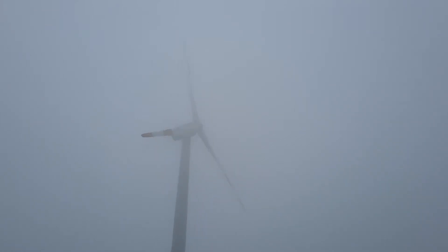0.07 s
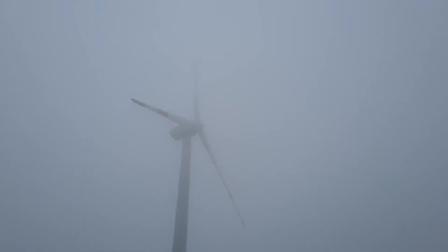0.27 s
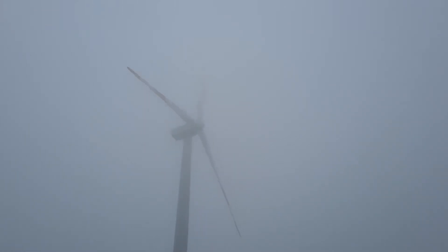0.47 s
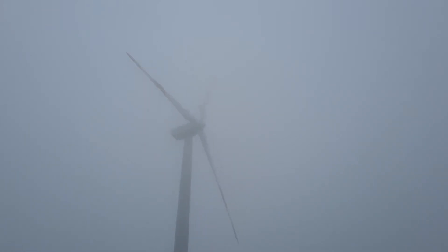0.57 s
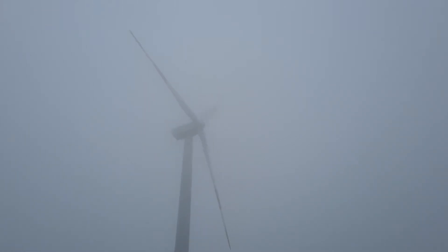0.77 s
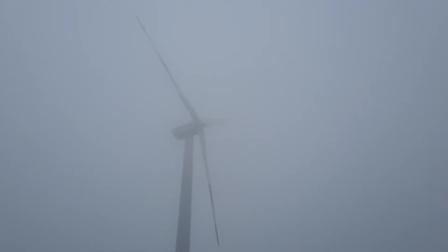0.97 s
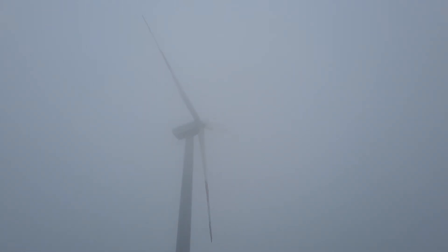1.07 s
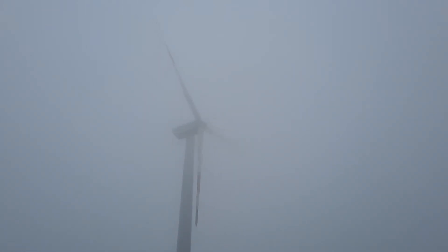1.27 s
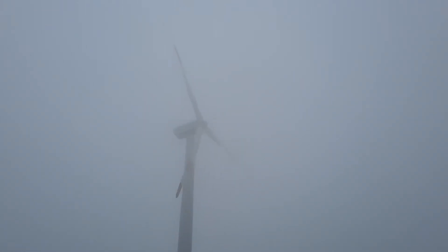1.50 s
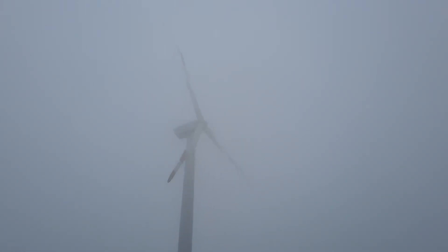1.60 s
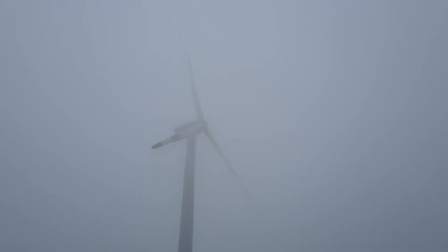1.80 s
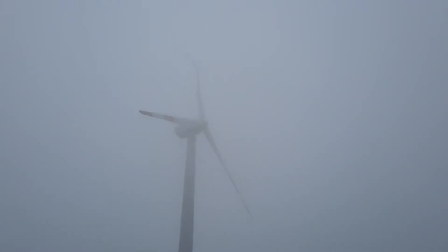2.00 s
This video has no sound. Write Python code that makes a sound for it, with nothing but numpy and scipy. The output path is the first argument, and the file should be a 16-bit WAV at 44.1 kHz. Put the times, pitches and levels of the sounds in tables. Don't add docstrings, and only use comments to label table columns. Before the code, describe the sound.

Rough wind noise right on an unprotected microphone outdoors: deep uneven thuds and fluttering for the first second, then much quieter soft bumps, faint far wind and turbine swish, and thin airy hiss on the left.

```python
import sys
import numpy as np
from scipy import signal
from scipy.io import wavfile
from scipy.ndimage import uniform_filter1d, map_coordinates

SR = 44100
rng = np.random.default_rng(int(sys.argv[2]) if len(sys.argv) > 2 else 0)


def to_wav(sig):
    pcm = np.clip(np.atleast_2d(sig), -1, 1) * 32767
    pcm = np.round(pcm).astype(np.int16)
    wavfile.write(sys.argv[1], SR, pcm.T)


def invert_db(level):
    return 10 ** (np.asarray(level, dtype=float) / 20)


N = 90404
T = np.arange(N) / SR

# middle in seconds, width in seconds, thump level in dB,
# thump pitch in Hz, flutter level in dB.
LEFT_EDDIES = [(0.055, 0.015, -33, 148, -50), (0.083, 0.007, -52, 95, -55),
               (0.119, 0.05, -40.5, 106.5, -43), (0.189, 0.0085, -34, 114, -71.5),
               (0.249, 0.011, -22, 127, -24), (0.285, 0.0098, -22, 111.3, -30.5),
               (0.35, 0.015, -31, 137, -36.5), (0.395, 0.023, -14, 94.7, -24),
               (0.456, 0.038, -28.5, 133, -30.5), (0.505, 0.01, -22.5, 107, -22.5),
               (0.549, 0.051, -24, 96.4, -36.5), (0.597, 0.011, -28.5, 120, -30.5),
               (0.631, 0.0059, -33.5, 124.4, -37), (0.655, 0.013, -20.5, 103.4, -24.5),
               (0.681, 0.015, -21, 142, -38.5), (0.718, 0.013, -25, 107, -25.5),
               (0.756, 0.017, -23, 97.7, -23), (0.785, 0.021, -24.5, 130, -27.5),
               (0.856, 0.033, -30, 119, -35), (0.91, 0.024, -29, 140, -27.5),
               (0.927, 0.016, -53, 140, -19.5), (0.96, 0.016, -37.5, 126, -48),
               (0.987, 0.0062, -21.5, 102.6, -32), (1.017, 0.015, -26, 144, -20.5),
               (1.077, 0.011, -57, 115.6, -42.5), (1.13, 0.0064, -47, 94, -59),
               (1.154, 0.0418, -41.5, 96.7, -59.5), (1.217, 0.028, -44.1, 90, -51.5),
               (1.271, 0.015, -35, 91, -62), (1.34, 0.016, -39.5, 108, -55), (1.493, 0.017, -67, 116, -64),
               (1.558, 0.021, -35, 80, -55), (1.662, 0.016, -80, 140, -54), (1.757, 0.01, -39, 106, -72),
               (1.775, 0.015, -53, 173, -47), (1.832, 0.0081, -71, 154, -47.5),
               (1.912, 0.028, -36, 80.6, -64), (1.958, 0.014, -35, 72, -55), (1.987, 0.021, -36, 163, -47),
               (2.035, 0.038, -43, 82, -57),
               (0, 0.0059, -35.5, 124, -32.5),
    (.228, .012, -29.5, 90, -43.5),
    (.31, .02, -51, 148.7, -34),
    (.377, .012, -18.5, 164, -25),
    (.471, .012, -34.5, 152, -28.5),
    (0.562, .01, -20.5, 135, -23.5),
    (0.737, .014, -31.5, 98.3, -33.5),
    (.872, .012, -30.5, 140, -29),
    (1.008, .01, -47, 152, -28),
    (1.044, .016, -37.5, 130, -40),
]
# middle in seconds, width in seconds, thump level in dB,
# thump pitch in Hz, flutter level in dB.
RIGHT_EDDIES = [(0.031, 0.03, -39.5, 118, -57), (0.056, 0.0047, -26, 106, -47),
                (0.083, 0.0088, -58, 97, -65), (0.123, 0.045, -31.5, 129.3, -47),
                (0.249, 0.012, -25, 108, -55), (0.267, 0.018, -33.5, 137, -31.5),
                (0.289, 0.011, -27.5, 78, -47), (0.349, 0.0071, -21.5, 122, -48),
                (0.367, 0.015, -18.5, 127, -31), (0.393, 0.011, -11, 107.4, -25.5),
                (0.461, 0.013, -21.5, 154, -29.5), (0.503, 0.022, -15, 104, -30),
                (0.552, 0.022, -23, 99, -27.5), (0.599, 0.009, -25, 107, -53),
                (0.632, 0.033, -32.5, 127, -40), (0.657, 0.012, -19.5, 78.8, -24.5),
                (0.725, 0.021, -45.5, 96, -34), (0.763, 0.038, -25, 119, -25.5),
                (0.786, 0.0057, -41, 109, -23), (0.855, 0.013, -29.5, 134, -29.1),
                (0.927, 0.038, -42, 118, -24.5), (0.959, 0.0081, -27.5, 109.6, -22),
                (1.016, 0.01, -39, 109, -25.5), (1.076, 0.019, -44.5, 132, -48),
                (1.108, 0.011, -35.5, 86, -60.5), (1.152, 0.022, -42.5, 77, -70),
                (1.173, 0.01, -33.5, 82, -54.5), (1.191, 0.0086, -35, 125.5, -67),
                (1.218, 0.026, -34.5, 99, -60), (1.268, 0.03, -32, 89, -47.5),
                (1.301, 0.0073, -49, 94, -57), (1.368, 0.044, -49, 108, -52),
                (1.399, 0.017, -39.5, 81, -61), (1.463, 0.023, -52, 93, -56),
                (1.546, 0.048, -35.5, 87, -66), (1.623, 0.035, -42.5, 88, -53),
                (1.752, 0.017, -37.0, 105, -65), (1.777, 0.02, -46, 142, -50),
                (1.907, 0.066, -36.5, 82, -60), (1.998, 0.016, -70, 152, -42.5),
                (.001, 0.0054, -36.5, 118, -42.5),
    (.228, 0.008, -29, 104, -33),
    (0.333, 0.011, -28, 129, -38.5),
    (.444, .012, -30, 151.6, -30),
    (.52, 0.02, -20.5, 100, -26.5),
    (.678, 0.035, -24.5, 150, -29.5),
    (.91, 0.017, -28.5, 165, -29),
    (.992, 0.022, -28.5, 160, -43),
    (1.037, 0.0085, -41, 170, -34),
]
# time in seconds, left port level in dB,
# right port level in dB, flutter compared with the low swing in dB.
GUST = [(0, -37, -38.5, -16.5), (.19, -50, -47, -17), (.23, -34, -34, -0.5), (.31, -58, -34.5, -7),
        (.36, -36, -33, -3), (.43, -45, -32.5, -6.5), (.6, -30, -29, -5.5), (.82, -38, -40, -2),
        (.89, -40.5, -41.5, 9), (.99, -33.5, -33.5, 3.5), (1.06, -51, -38, -11.5), (1.36, -69, -41, -35),
        (1.42, -70, -44.5, -18), (1.68, -94, -53.5, -6), (1.76, -56, -40.5, -26),
        (1.84, -107, -42.5, -14.5), (1.97, -47.5, -48.5, -2.5), (2.05, -55, -72.5, -25)]
# pitch in Hz, level in dB per Hz.
ROAR = [(170, -26), (290, 4.5), (400, 3.5), (560, -6), (800, -19), (1100, -27), (1400, -24.5),
        (2000, -38.5), (3200, -57.5)]
# time in seconds, roar level in dB, tilt in dB per half octave,
# blade level in dB.
SWISH = [
    (0, -55, 1.5, -65.5),
    (.2, -54.5, 0.74, -68.5),
    (.4, -68.5, 4, -66),
    (.8, -50, 1, -76.5),
    (1.1, -54.5, 1.73, -70.5),
    (1.6, -59.5, 2.5, -76),
    (2.05, -62.5, 3, -71.5),
]
# time in seconds, whistle level in dB, whistle pitch in Hz, hiss level in dB.
PORT_AIR = [(0, -69.5, 2400, -73), (.15, -82, 2450, -75.5), (.37, -73, 2450, -74), (.45, -80, 2400, -78.5),
            (.7, -79, 2500, -80.5), (.82, -78, 2450, -84), (1.06, -71.5, 2250, -86), (1.17, -76, 2300, -90),
            (1.3, -75, 2350, -87), (1.45, -75.5, 2300, -102), (1.6, -74.5, 2350, -101.5),
            (1.8, -75, 2400, -90), (2.05, -79, 2400, -90)]
# pitch in Hz, level in dB per Hz.
SELF_NOISE = [(2500, 12.5), (4000, 0), (6000, 1), (9000, -2), (13000, 3.5), (15500, 1.5)]


def rms_one(x):
    return x / np.sqrt(np.mean(x ** 2) + 1e-20)


def in_time(rows):
    s, *columns = np.transpose(rows)
    return [np.interp(T, s, column) for column in columns]


def cut(x, hz, kind, order=2):
    return signal.sosfilt(signal.butter(order, hz, kind, fs=SR, output="sos"), x)


def resonance(x, hz, width_hz):
    r = np.exp(-np.pi * width_hz / SR)
    return signal.lfilter([1 - r, 0, r - 1], [1, -2 * r * np.cos(2 * np.pi * hz / SR), r * r], x)


def drift(rate):
    knots = rng.standard_normal(200)
    return rms_one(map_coordinates(knots, [T * rate], order=3))


def kicks(size):
    kicks_per_s, spread_db, push_share = 220, 5, 0.77
    happens, luck, direction = rng.random((3, size))
    strength = invert_db(-spread_db * np.log(np.maximum(luck, 0.02)))
    return (happens < kicks_per_s / SR) * strength * np.sign(push_share - direction) + 1e-18


def thump(x, low_hz, high_hz):
    return cut(cut(x, low_hz, "high", order=3), high_hz, "low", order=5)


def flutter(x, splash_db):
    top_hz = 481.5
    ring = cut(resonance(x, 289, width_hz=104), top_hz, "low", order=4)
    ring = cut(ring, 195, "high", order=3)
    splash = cut(cut(x, 680, "low", order=7), top_hz, "high")
    return ring + invert_db(splash_db) * splash


def eddies(table, suck_share, flutter_sign, edge_db):
    size = 8192
    main_kick_db, strong_flutter_db = 17, -24
    out = np.zeros(N + 2 * size)
    t = (np.arange(size) - size // 2) / SR
    for s, width, thump_db, hz, flutter_db in table:
        train = kicks(size)
        train[size // 2] = invert_db(main_kick_db)
        train = train * np.exp(-0.5 * (t / (0.56 * width)) ** 2)
        push_or_suck = np.sign(rng.random() - suck_share)
        swing = resonance(train, hz, 0.63 * hz)
        low = push_or_suck * thump(swing, 0.37 * hz, 1.673 * hz)
        splash_db = -40.5 + edge_db + 4.5 * (flutter_db - strong_flutter_db)
        high = flutter_sign * flutter(train, splash_db)
        for y, db, lag in ((low, thump_db, 0.8 / hz), (high, flutter_db, 0.003)):
            y = y * np.exp(-((t - lag) / (1.6 * width + lag)) ** 4)
            level = invert_db(db) * np.sqrt(0.74 * width * SR / np.sum(y ** 2))
            start = int((s - lag) * SR) + size // 2
            out[start:start + size] += level * y
    return out[size:size + N]


def turbulence():
    left_db, right_db, share_db = in_time(GUST)
    fine_share, rocking_share = 0.8, 1.3
    run_in = 4000
    rocking = rng.standard_normal(N + run_in)
    ports = []
    for db, sign in ((left_db, 1), (right_db, -1)):
        train = rms_one(kicks(N + run_in)) + fine_share * rng.standard_normal(N + run_in)
        low = thump(train, 46, 159)[run_in:]
        high = flutter(train + sign * rocking_share * rocking, splash_db=-37)[run_in:]
        low, high = [x / np.sqrt(uniform_filter1d(x ** 2, size=1500) + 0.38 * np.mean(x ** 2))
                     for x in (low, high)]
        ports.append(invert_db(db) * (low + invert_db(share_db) * high))
    return np.array(ports)


def banded(spectrum, low_hz, count, alike, patchy_db, tilt_db):
    out = 0
    white = rng.standard_normal((2, 2, N))
    point_hz, point_db = np.transpose(spectrum)
    for k in range(count):
        low = low_hz * 2 ** (k / 2)
        middle_hz = low * 2 ** (1 / 4)
        mid, side = cut(white[k % 2], [low, low * np.sqrt(2)], "band")
        stereo = np.sqrt(1 + alike) * mid + np.sqrt(1 - alike) * side * [[1], [-1]]
        db = np.interp(np.log(middle_hz), np.log(point_hz), point_db)
        out = out + invert_db(db + patchy_db * drift(22) + tilt_db * k) * stereo
    return rms_one(out)


def roar():
    db, tilt_db, blade_db = in_time(SWISH)
    patchy_db = 0.8
    mid, side = cut(rng.standard_normal((2, N)), [800, 1140], "band", order=3)
    blades = rms_one(mid + 0.6 * side * [[1], [-1]]) * invert_db(blade_db + patchy_db * drift(9.3))
    far = banded(ROAR, low_hz=164.9, count=9, alike=0.55, patchy_db=patchy_db, tilt_db=tilt_db)
    return blades + invert_db(db) * cut(far, 204, "high", order=4)


def port_air():
    whistle_db, hz, hiss_db = in_time(PORT_AIR)
    whistle_width_hz, whistle_right_db = 440, -16
    a, b = cut(rng.standard_normal((2, 2, N)), whistle_width_hz / 2, "low", order=3)
    phase = 2 * np.pi * np.cumsum(hz) / SR
    whistle = rms_one(a * np.cos(phase) + b * np.sin(phase))
    whistle = whistle * invert_db(whistle_db + 2.0 * drift(10.0))
    hiss = cut(cut(rng.standard_normal(N), 6900, "high", order=6), 12800, "low")
    hiss = rms_one(hiss) * invert_db(hiss_db + 0.65 * drift(9.5))
    return whistle * invert_db([[0], [whistle_right_db]]) + hiss * [[1], [0]]


def tick():
    start_s, level_db, right_db = 0.7443, -51, -22
    ring_hz, ring_t60_s = 2720, 0.012
    age = np.maximum(T - start_s, 0)
    burst = rng.standard_normal(N) * (T >= start_s) * np.exp(-age / 0.0007)
    crack = cut(burst, [2400, 13000], "band", order=1)
    ring = 0.4 * np.sin(2 * np.pi * ring_hz * age) * invert_db(-60 * age / ring_t60_s)
    return invert_db(level_db) * (crack + ring) * invert_db([[0], [right_db]])


def bird():
    middle_s, length_s, level_db = 1.603, 0.017, -86
    noise = rms_one(cut(rng.standard_normal((2, N)), [5200, 6000], "band", order=3))
    return invert_db(level_db) * noise * np.exp(-((T - middle_s) / length_s) ** 4)


def scene():
    left = eddies(LEFT_EDDIES, suck_share=0.1, flutter_sign=1, edge_db=1)
    right = eddies(RIGHT_EDDIES, suck_share=0.3, flutter_sign=-1, edge_db=-7)
    return np.array([left, right]) + turbulence() + roar() + port_air() + tick() + bird()


def low_pass(x):
    return signal.sosfilt(signal.butter(12, 15720, fs=SR, output="sos"), x)


def record(dry):
    overload = 0.9
    rounded = overload * np.tanh(dry / overload)
    noise = banded(SELF_NOISE, low_hz=1970, count=6, alike=0, patchy_db=1.2, tilt_db=0)
    noise_db = -81 - 1.2 * T
    return low_pass(rounded + invert_db(noise_db) * noise)


dry = scene()
out = record(dry)
to_wav(out)
```